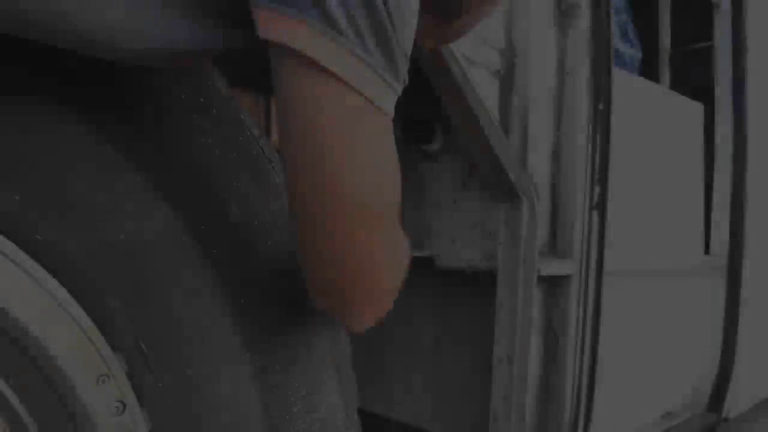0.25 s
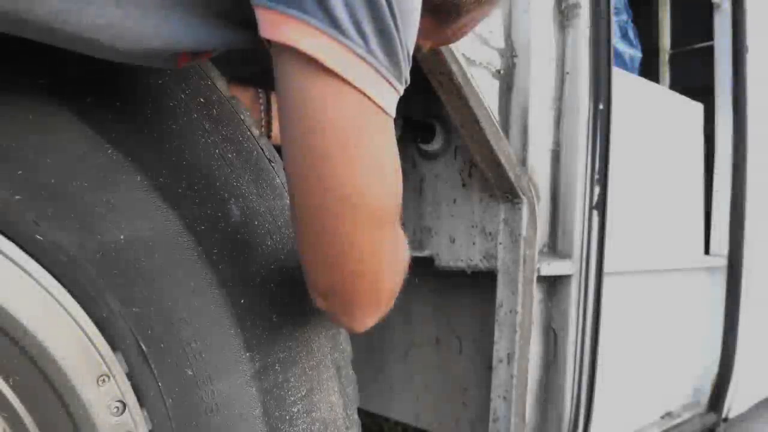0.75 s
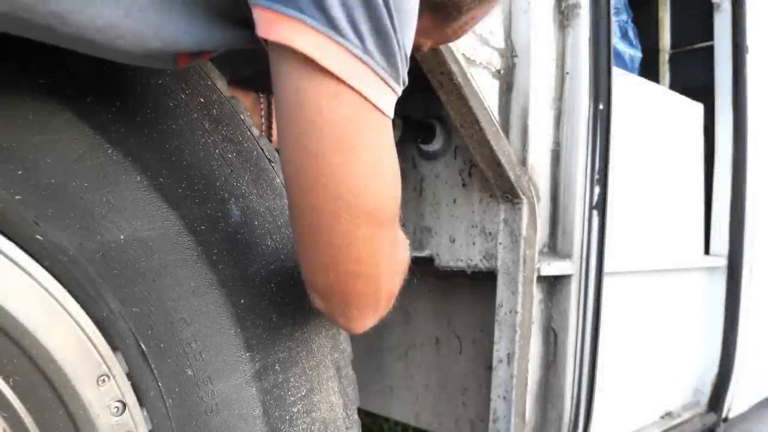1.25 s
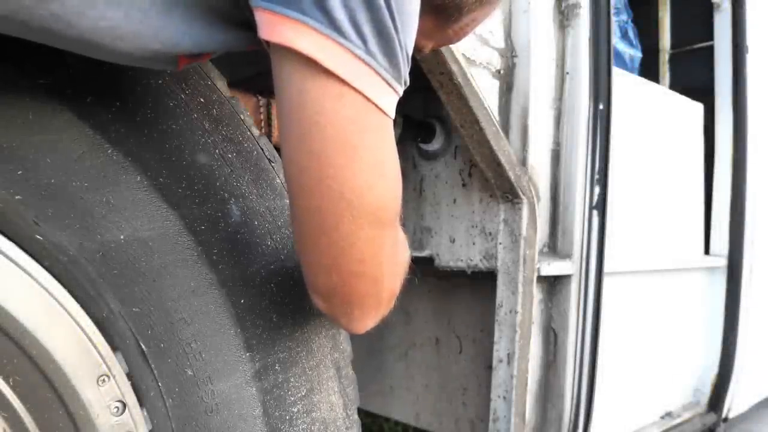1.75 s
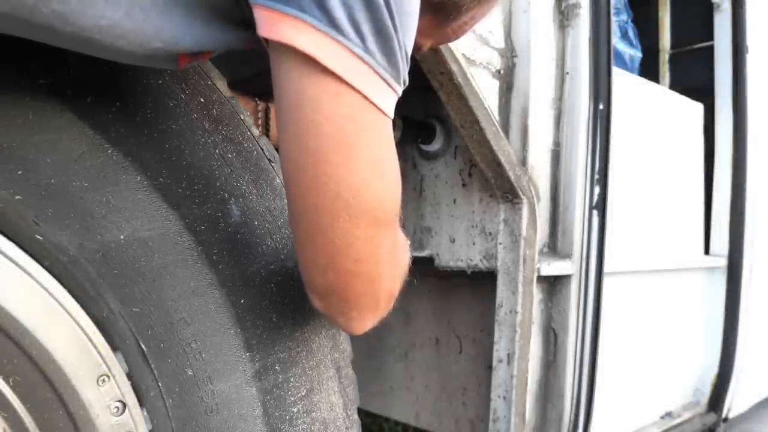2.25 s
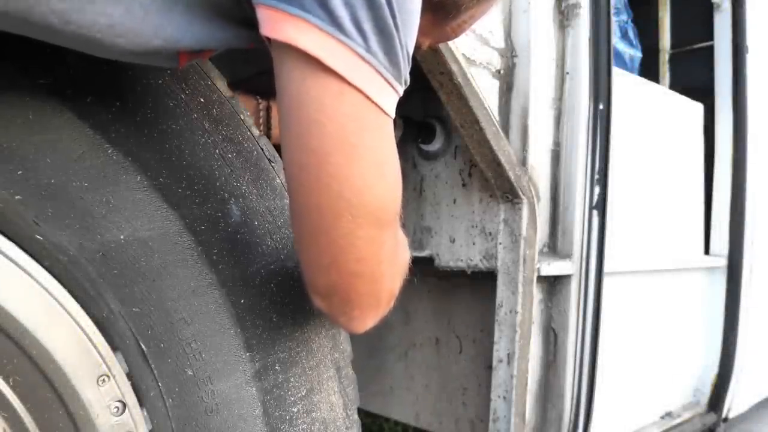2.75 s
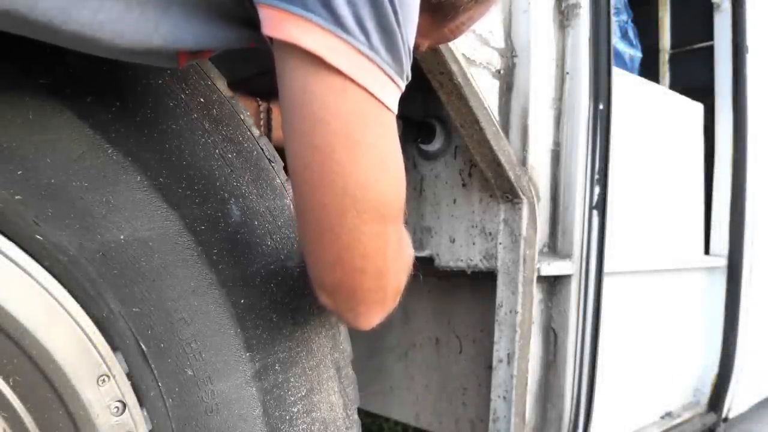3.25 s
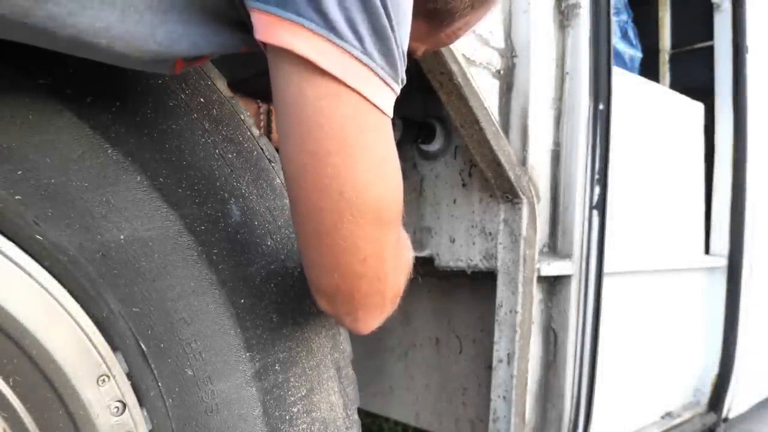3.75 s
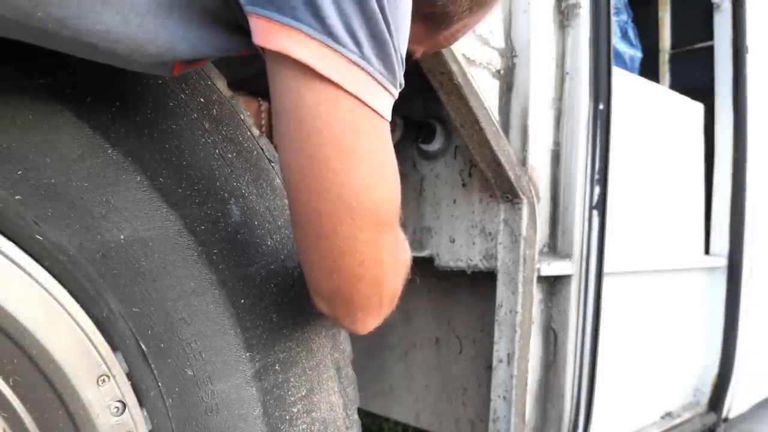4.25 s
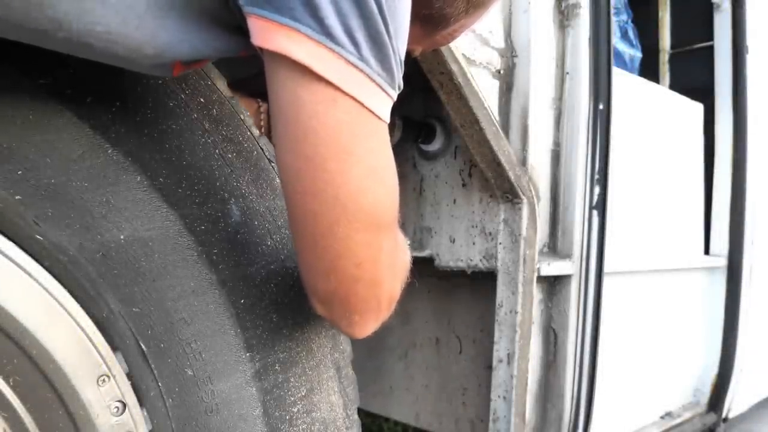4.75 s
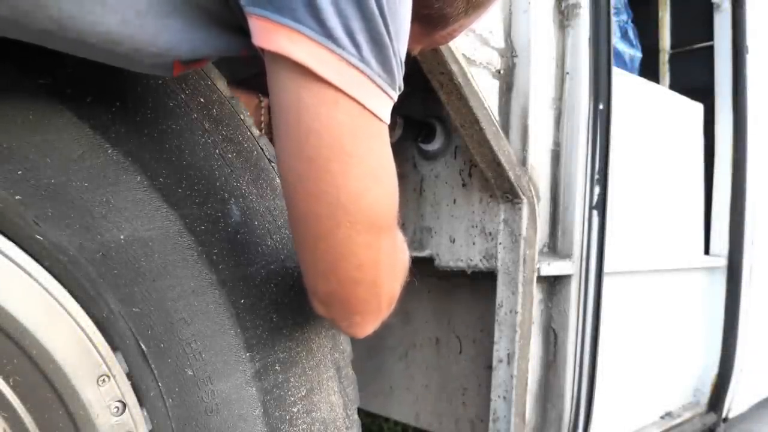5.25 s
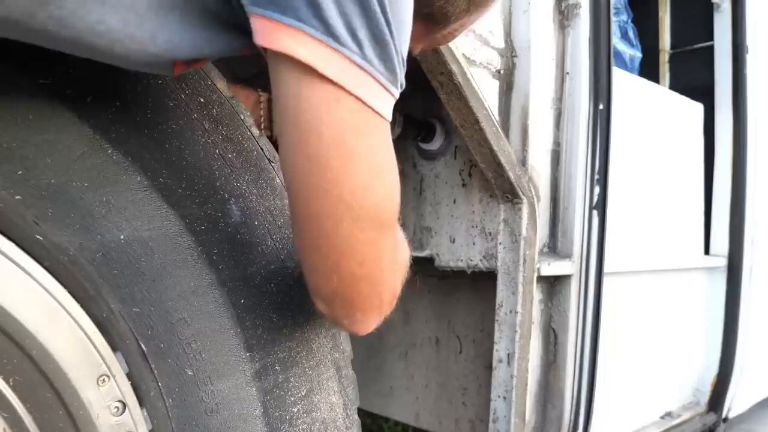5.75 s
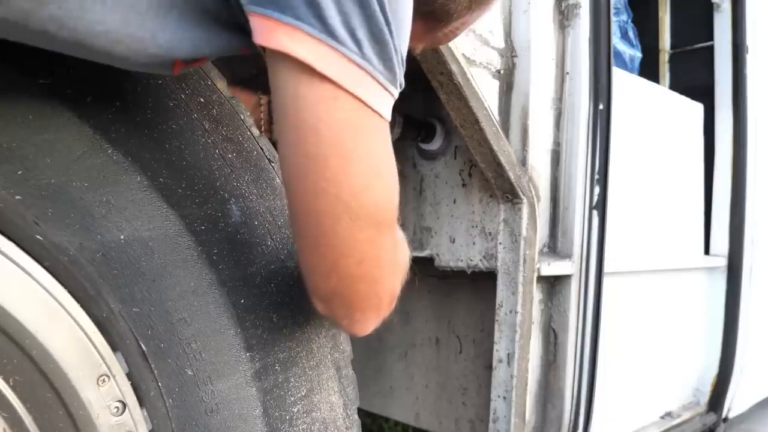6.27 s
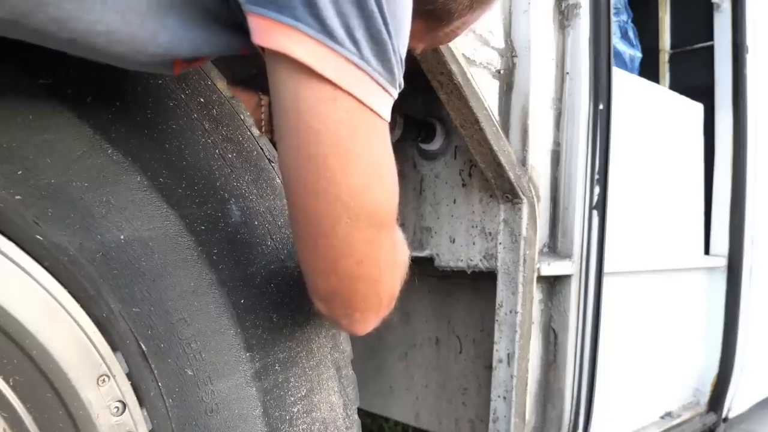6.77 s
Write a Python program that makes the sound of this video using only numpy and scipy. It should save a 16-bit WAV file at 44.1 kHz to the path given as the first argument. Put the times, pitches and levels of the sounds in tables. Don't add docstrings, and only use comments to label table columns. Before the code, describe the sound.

Beside a truck wheel, about a metre from a small camera, a drill cuts a body panel. Layered motor whine, fan hiss and coarse metal grinding run continuously after a fast fade-in. Regular double knocks and cracks ring the steel; hard ones add a dull low jolt and slight level dips. From about four and a half seconds the cut is deeper and the tone wavers more, still running at the end.

```python
import sys
import numpy as np
from scipy import signal
from scipy.fft import rfft, irfft
from scipy.io import wavfile
from scipy.ndimage import uniform_filter1d

SR = 44100
rng = np.random.default_rng(int(sys.argv[2]) if len(sys.argv) > 2 else 0)


def makeup_ratio(level_db):
    decades = np.asarray(level_db, float) / 20
    return 10 ** decades


def dump_mix(stems):
    frames = np.atleast_2d(stems).T
    limited = np.clip(frames, -1, 1)
    pcm = np.round(limited * 32767).astype(np.int16)
    wavfile.write(sys.argv[1], SR, pcm)


N = 309141

# frequency in Hz, width in Hz, peak level in dB.
SHEET = [(113.5, 5.9, -13.5), (133.4, 12.5, -12.5), (253, 36, -9.5), (300, 19, -19), (360, 21.5, -8),
         (414, 17, -8.5), (503, 22.6, -4), (533, 72, -7), (619, 22, -8.5), (643.4, 19.4, -4),
         (772.7, 17.6, -1.5), (808.7, 22, -1), (844, 53, -1), (978, 55, -6.5), (1106, 96, -11),
         (1230, 68, -9.5), (1358, 46, -5), (1618, 74, -13), (1775, 56, -11), (1877, 30, -6),
         (2244, 143, -8.5), (2300, 118, -7), (2790, 25, -20), (3000, 78, -17.5)]


def seconds():
    return np.arange(N) / SR


def curves(table):
    s, *columns = np.transpose(table)
    return [np.interp(seconds(), s, column) for column in columns]


def unit(x):
    return x / np.sqrt(np.mean(x ** 2))


def colour(x, points):
    hz, db = np.transpose(points)
    log_hz = np.log(np.arange(N // 2 + 1) * SR / N + 1)
    return irfft(rfft(x) * makeup_ratio(np.interp(log_hz, np.log(hz), db)), N)


def band(x, lo_hz, hi_hz):
    sos = signal.butter(2, [lo_hz, hi_hz], "bandpass", fs=SR, output="sos")
    return signal.sosfilt(sos, x)


def ring(x, modes):
    t = np.arange(SR // 4) / SR
    response = np.zeros(len(t))
    for k, (hz, width_hz, db) in enumerate(modes):
        decay = np.exp(-np.pi * width_hz * t)
        response += (-1) ** k * makeup_ratio(db) * width_hz * decay * np.sin(2 * np.pi * hz * t)
    return signal.fftconvolve(x, response)[:N]


def walk(rate):
    place = seconds() * rate
    k = place.astype(int)
    levels = 1.15 * rng.standard_normal(k[-1] + 2)
    step = (place - k) ** 2 * (3 - 2 * (place - k))
    return levels[k] + step * (levels[k + 1] - levels[k])


def teeth(spread_db, share):
    chance = rng.random((3, N))
    clicks = chance[0] < share
    sign = np.sign(chance[1] - .5)
    size = makeup_ratio(-spread_db * np.log(1 - chance[2]))
    return unit(clicks * sign * size)


def shaft():
    # time in seconds, saw turns so far, free motor speed in Hz, sag at the bind in Hz.
    cut = [(0, -.85, 273, 4), (.371, 1, 271, 6), (.967, 4, 265.5, 6), (1.155, 5, 263.5, 5),
           (1.763, 8, 266.5, 5), (2.196, 10, 265.5, 6), (2.824, 13, 262, 12), (3.235, 15, 261, 5),
           (3.653, 17, 257, 13), (4.082, 19, 257, 16), (4.494, 21, 255, 9), (4.665, 22, 253.5, 7),
           (5.098, 24, 251.5, 11.5), (5.355, 25, 250, 6.5), (5.563, 26, 250, 7), (5.759, 27, 250.6, 11),
           (7.053, 33, 251, 11)]
    # share of the turn, shallow-cut drag (0-1), deep-cut drag (0-1.15), deep-cut gear slack in dB.
    drag = [
        (0, 1, 1.15, 1),
        (.14, .5, .8, 0),
        (.34, .1, .25, -6),
        (.52, 0, .45, -4),
        (.78, .25, 0, 0),
        (1, 1, 1.15, 1),
    ]
    deep_from_s = [4.5, 4.7]
    turn, free_hz, sag_hz = curves(cut)
    share, *columns = np.transpose(drag)
    shallow, deep, slack_db = (np.interp(turn % 1, share, column) for column in columns)
    depth = np.interp(seconds(), deep_from_s, [0, 1])
    held_hz = sag_hz * (shallow + depth * (deep - shallow))
    shaft_hz = uniform_filter1d(free_hz - held_hz, size=400)
    fan_fade_db = -.55 * held_hz * (1 - depth)
    return shaft_hz, depth * slack_db, fan_fade_db


def whine():
    # multiple of the shaft speed, then level in dB above the hiss early, midway and deep.
    tones = [(.586, -40, -36, -30), (1, -36, -31, -26), (14, -17, -21, -30), (17, -12, -21, -22),
             (18, -16, -18, -20), (21, -19, -17, -15), (22.52, -18, -22, -14), (24, -18, -20, -24),
             (25, -20, -17, -19), (29, -22, -23, -19), (31, -26, -25, -25)]
    tones_at_s = [1.5, 1.8, 4.2]
    # time in seconds, then the levels of the
    # 15th, 16th and 19th multiples in dB above the hiss.
    lead = [(0, -14, -9, -10), (.9, -11, -9, -13), (1.15, -12, -15, -13), (1.4, -13, -15, -10),
            (1.65, -14, -15, -10), (2.2, -15, -16, -18), (2.5, -9, -15, -13), (3.35, -8, -14, -14),
            (3.7, -13, -13, -10), (4.7, -13.5, -14, -13), (7.01, -13.5, -14, -15)]
    # shaft speed in Hz, level in dB above the hiss.
    mesh = [(240, -7), (250.5, -9), (254, -13), (257, -23), (260, -24), (264, -19), (270, -17)]
    mesh_ratio = 11.26

    shaft_hz, slack_db, fade_db = shaft()
    turns = np.cumsum(shaft_hz * (1 + .0012 * walk(70))) / SR
    lines = []
    for multiple, *db in tones:
        level_db = np.interp(seconds(), tones_at_s, db)
        lines.append((multiple, makeup_ratio(level_db - 1 + 3 * walk(45))))
    for multiple, db in zip((15, 16, 19), curves(lead)):
        lines.append((multiple, makeup_ratio(db + 1 + fade_db + 2.5 * walk(50))))
    mesh_db = np.interp(shaft_hz, *np.transpose(mesh)) + slack_db
    lines.append((mesh_ratio, makeup_ratio(mesh_db + 1.5 * walk(40) + 3 * walk(140))))

    out = np.zeros(N)
    for multiple, size in lines:
        phase = 2 * np.pi * multiple * turns + .6 * walk(60)
        out += np.sqrt(2) * size * np.sin(phase)
    return out


def hiss():
    # frequency in Hz, spectral level in dB per Hz.
    air_colour = [(1180, 8), (2000, -4.5), (3050, -2), (3410, -6), (3820, -2), (5120, 2.5), (5870, -4.5),
                  (6400, -5.5), (6860, -4.5), (7810, -7), (11600, -17.5), (13400, -16), (14300, -19.5),
                  (15700, -21)]
    swell = walk(11)
    out = np.zeros(N)
    for hz in 2000 * 2 ** np.arange(0, 3, .5):
        flicker = makeup_ratio(0.5 * swell + 1.35 * walk(25))
        out += flicker * band(rng.standard_normal(N), hz * 0.9, hz * 1.472)
    return unit(colour(out, air_colour))


def casing(x):
    # frequency in Hz, width in Hz, lift in dB.
    shell = [(4160, 130, -0.5), (4720, 130, 1.5), (6330, 180, 5.5)]
    grid_hz = np.arange(N // 2 + 1) * SR / N
    lift_db = sum(db / (1 + (2 * (grid_hz - hz) / width) ** 2) for hz, width, db in shell)
    return irfft(rfft(x) * makeup_ratio(lift_db), N)


def grind():
    # frequency in Hz, spectral level in dB per Hz.
    scrape_colour = [(35, -57), (60, -24), (494, 22.5), (690, -3.5), (780, -8), (1500, 1), (1880, 17.5),
                     (3410, 0), (4000, 1), (5200, -34), (8800, -120)]
    chips = makeup_ratio(walk(30)) * makeup_ratio(.5 * walk(70)) * teeth(spread_db=2.5, share=.1)
    ringing = unit(ring(chips, SHEET))
    scrape = unit(colour(chips, scrape_colour))
    return unit(ringing + makeup_ratio(-3) * scrape)


def catches():
    # time in seconds, peak level in dB, crack level in dB, gap to the
    # second tooth in seconds, second peak level in dB.
    binds = [(.148, -19.5, -9, 0.02, -18.5), (.345, -9, -14.5, 0.037, -6),
             (0.555, -9, -21, 0.04, -8.5), (.746, -9, -8.5, 0.03, -8.5),
             (0.952, -18.5, 0.5, 0.023, -24), (1.164, -14.5, -7, 0.0195, -11.5),
             (1.362, -10.5, -10.5, 0.021, -5.5), (1.567, -12, -11.5, 0.021, -5),
             (1.772, -10.5, -5, 0.022, -15.5), (1.977, -11, -7, 0.02, -8.5),
             (2.173, -10.5, -4, 0.034, -10.5), (2.376, -13, -7.5, 0.0235, -7),
             (2.584, -21.5, -0.5, 0.032, -14), (2.813, -15.5, -0.5, 0.024, -17),
             (2.998, -11.5, -4.5, 0.031, -11), (3.206, -10, -7.5, 0.023, -8.5),
             (3.409, -17.5, -2, 0.031, -18),
             (3.65, -14, -21, 0.014, -5.5), (3.836, -7.5, -12, 0.059, -24),
                  (4.049, -21, 1.5, 0.041, -12.5), (4.266, -9, -9, 0.039, -7.5),
                  (4.481, -12, -11.5, 0.0453, -8), (4.688, -12.5, -7, 0.035, -21),
                  (4.905, -15.5, -4, .02, -21), (5.135, -16, -6, 0.018, -36),
                  (5.354, -11, -7.5, 0.0094, -16), (5.564, -10, -15, 0.012, -12),
                  (5.776, -20, -5, .023, -24), (6.008, -18, -1, 0.013, -26), (6.22, -20.5, 3, 0.018, -15.5),
                  (6.449, -14.5, -9, 0.0097, -16), (6.647, -19.5, -0.5, 0.02, -16.5),
                  (6.877, -17.5, 1.5, 0.019, -15.5)]
    s, peak_db, crack_db, gap, second_db = np.transpose(binds)
    first = (s, peak_db, crack_db)
    second = (s + gap, second_db, crack_db - 4)
    chance = rng.standard_normal((len(s), 2)).T
    graze = (s + 0.096 + 0.014 * chance[0], -27 + 3 * chance[1], np.full(len(s), -4.5))
    return np.hstack([first, second, graze]).T


def bites():
    catch_s, thump_db = 0.014, -31
    push = np.zeros((3, N))
    for s, peak_db, crack_db in catches():
        i = int(s * SR)
        t = seconds()[:min(SR // 8, N - i)] / catch_s
        shape = (1 - np.exp(-t * 3)) * np.exp(-t ** 0.93)
        push[:, i:i + len(t)] += shape * makeup_ratio(peak_db + np.array([[0], [crack_db], [thump_db]]))
    chips = teeth(spread_db=2.5, share=.07)
    core = band(ring(push[0] * chips, SHEET), 714, 810)
    rest = band(ring(np.sqrt(push[0] * push[1]) * chips, SHEET), 298, 3600)
    body = (makeup_ratio(-1.5) * core + makeup_ratio(3) * rest) / np.std(ring(chips, SHEET))
    crack = band(push[1] * chips, 2250, 5800) / np.std(band(chips, 1770, 3620))
    thump = band(push[2] * (1 + .5 * walk(270)), 59, 250)
    return body + makeup_ratio(-0.5) * crack + makeup_ratio(7) * thump


def jolts():
    # time in seconds, peak level in dB.
    shoves = [
        (0.369, -52),
        (1.382, -58),
        (1.764, -51),
        (1.982, -53),
        (2.376, -54),
        (2.827, -48),
        (3.025, -49),
        (4.291, -50),
        (5.38, -55),
        (6.438, -52),
    ]
    swing_hz, swing_s = 45, 0.019
    push = np.zeros(N)
    for s, peak_db in shoves:
        push[int(s * SR)] = makeup_ratio(peak_db - 1)
    t = seconds()[:SR // 5]
    envelope = t / swing_s * np.exp(1 - t / swing_s)
    return signal.fftconvolve(push, envelope * np.sin(2 * np.pi * swing_hz * t))[:N]


def scene():
    # time in seconds, motor hiss level in dB, sheet grind level in dB above it.
    load = [(0.0, -67, 0), (0.036, -85, 0), (0.052, -50, -5), (0.08, -40, -8), (0.15, -32, -8.5),
            (0.35, -22.5, -5.5), (1.56, -22, -8.5), (1.68, -26, -4), (1.97, -22, -6), (2.32, -25, -4),
            (2.4, -21, -7), (2.46, -25, -9.5), (2.56, -23, -5), (3.24, -23.5, -5.5), (3.26, -25.5, -4),
            (3.61, -22.5, -5.5), (6.99, -22, -6.5), (7.01, -24, -11)]
    hiss_db, grind_db = curves(load)
    motor = makeup_ratio(-0.06) * casing(makeup_ratio(-0.02) * hiss() + whine())
    steady = makeup_ratio(hiss_db) * (motor + makeup_ratio(grind_db) * grind())
    mid = steady + bites() + makeup_ratio(13) * jolts()
    return np.array([mid, mid])


def block_grain(mid):
    # frequency in Hz, level in dB.
    side_level = [(30, -17), (200, -12), (600, -15.5), (5000, -14), (9000, -8), (15000, -8)]
    # frequency in Hz, share of narrow bands dropped (0-1).
    holes = [(6000, 0), (10000, .08), (14000, .16), (15500, .6), (15800, .9)]
    block, offset = 1024, 138
    pad = block - offset
    hz, _, cells = signal.stft(np.pad(mid, (pad, 0)), SR, "cosine", 2 * block, block)
    frames = cells.shape[1]
    chance = rng.random((len(hz), frames))

    bin_group = np.arange(len(hz)) // 6 * 6
    frame_pair = np.arange(frames) // 2 * 2
    hole_chance = chance[::-1][bin_group][:, frame_pair]
    kept = hole_chance > np.interp(hz, *np.transpose(holes))[:, None]

    bands = (np.sqrt(hz) / 2.4).astype(int)
    mood = 2.6 * rng.random(frames) - .9
    apart = chance[bands * 8] < mood * (1 - hz[:, None] / 17000) ** .8 * (hz[:, None] < 15000)
    side_gain = makeup_ratio(np.interp(hz, *np.transpose(side_level)))[:, None]
    size = uniform_filter1d(np.abs(cells), size=5, axis=0) * side_gain
    grain = size * apart * np.exp(2j * np.pi * rng.random(cells.shape))

    def sound(spectrum):
        return signal.istft(spectrum, SR, "cosine", 2 * block, block)[1][pad:pad + N]

    return sound(cells * kept), sound(grain)


def top_cut(x):
    return signal.sosfilt(signal.butter(12, 15840, fs=SR, output="sos"), x)


def record(dry):
    bass_cut = signal.butter(3, 87, "highpass", fs=SR, output="sos")
    thin = signal.sosfilt(bass_cut, dry[0])
    mid, side = block_grain(np.tanh(1.128 * thin) / 1.066)
    return top_cut(np.array([mid + side, mid - side]))


dry = scene()
out = record(dry)
dump_mix(out)
```